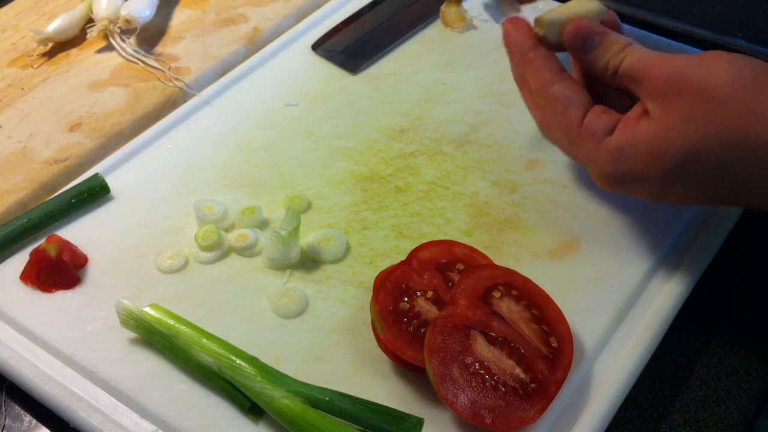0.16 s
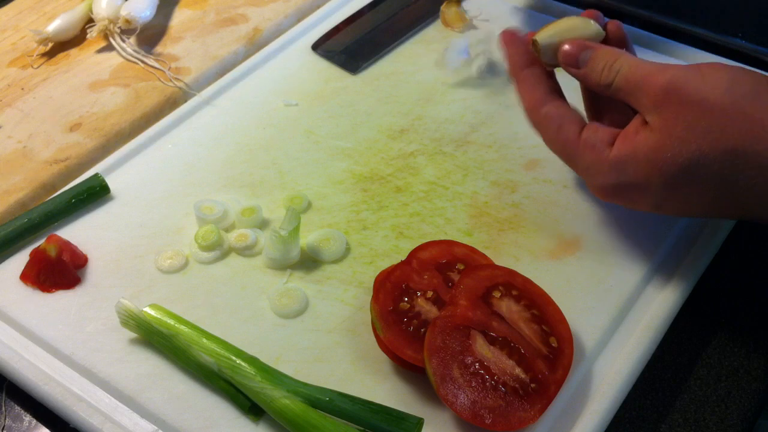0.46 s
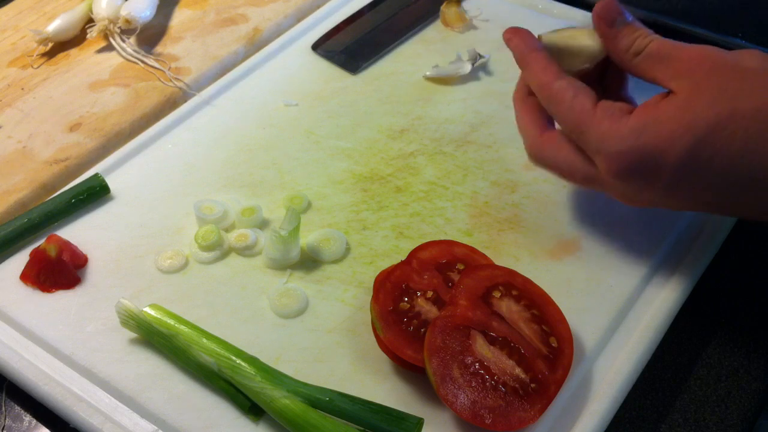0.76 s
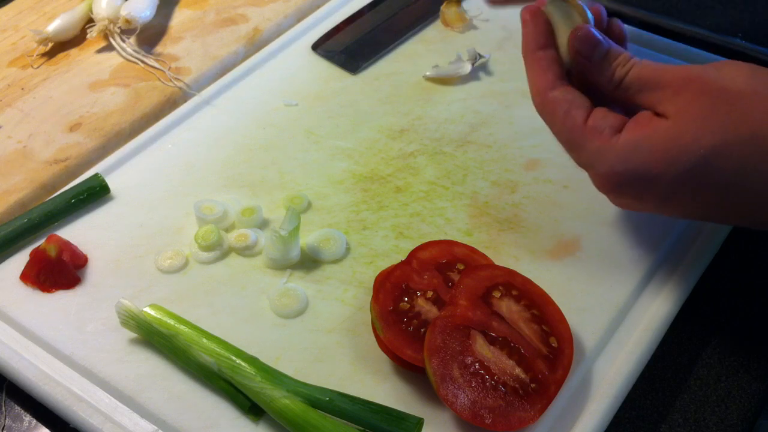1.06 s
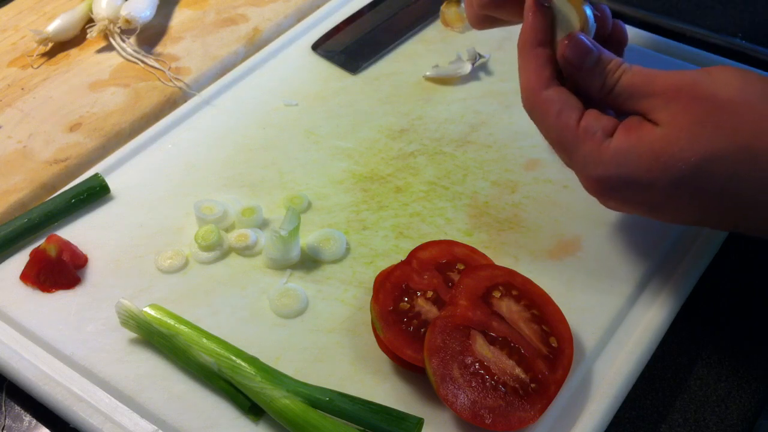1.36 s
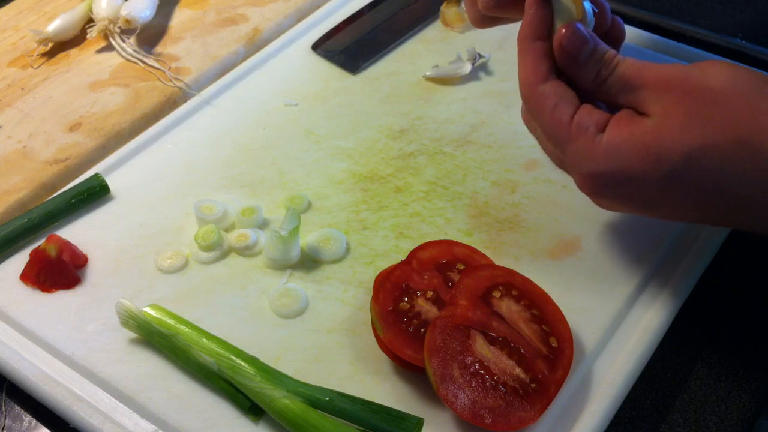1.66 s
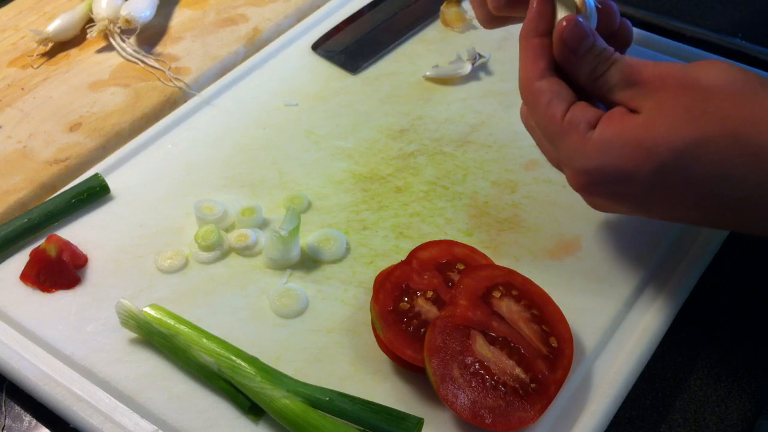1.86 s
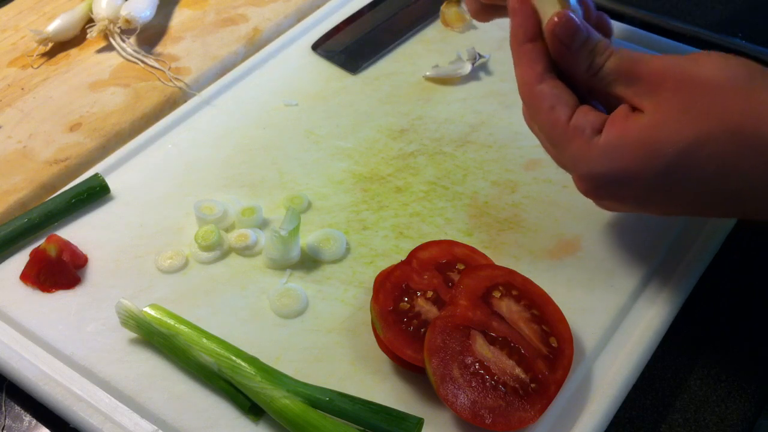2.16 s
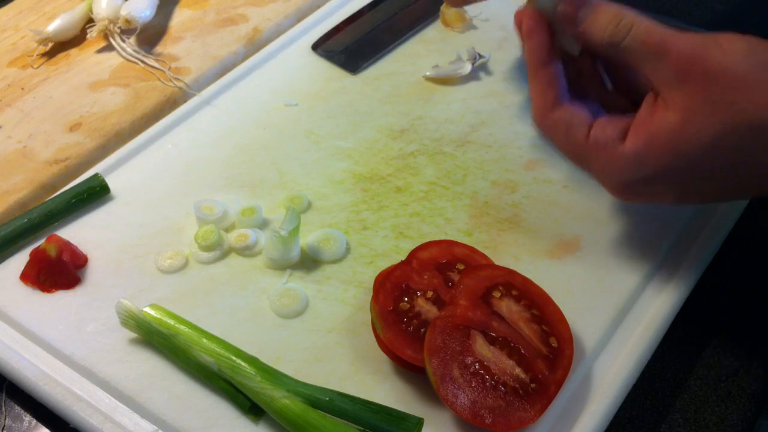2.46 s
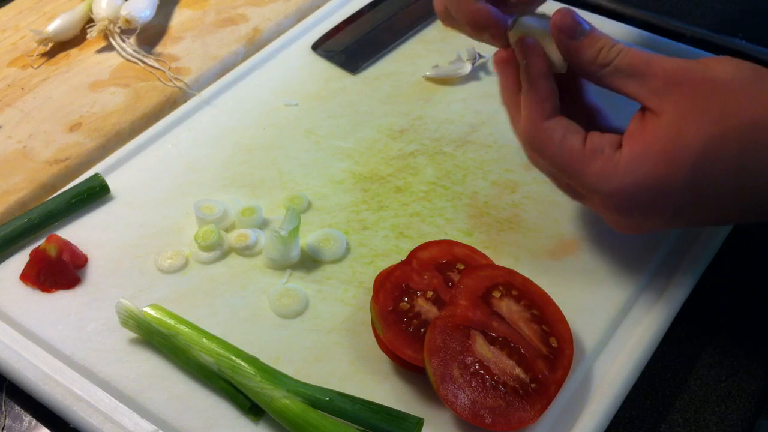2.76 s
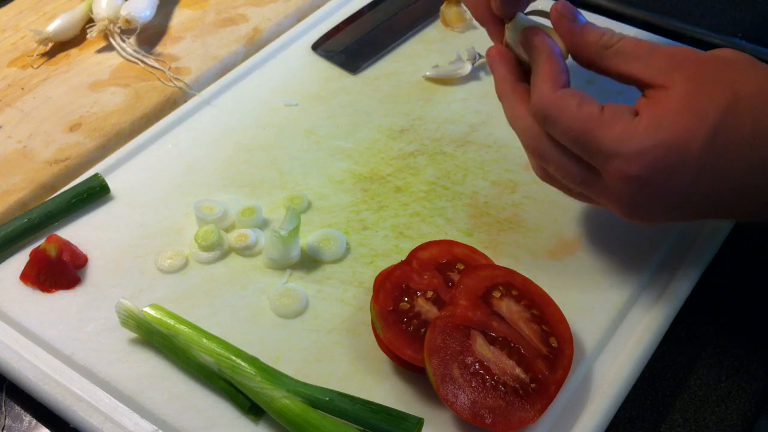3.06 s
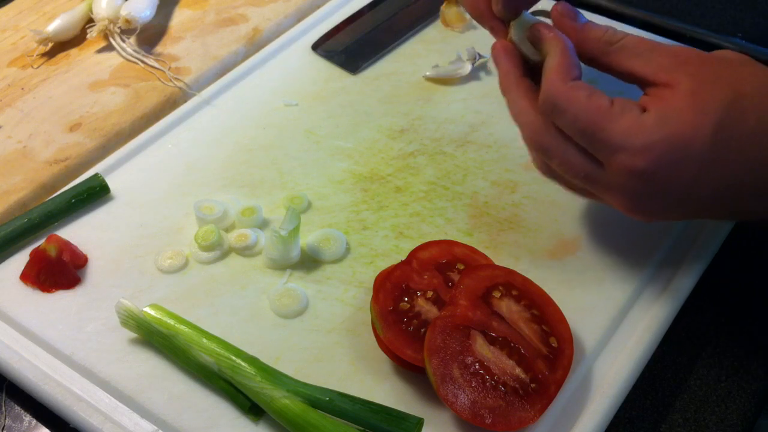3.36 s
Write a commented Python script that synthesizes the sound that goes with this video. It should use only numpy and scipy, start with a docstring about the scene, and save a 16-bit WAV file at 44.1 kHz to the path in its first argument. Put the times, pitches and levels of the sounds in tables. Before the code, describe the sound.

Papery garlic skin being peeled off a clove, with crisp snaps and faint fingernail picks.

```python
"""Papery snaps and crackling tears, loud at first, then small picks of a fingernail:
dry garlic skin is peeled off a clove by hand above a cutting board in a quiet kitchen.
Each crack rings a flake of skin for a few cycles; nail and finger add duller knocks on the clove.
Board and worktop throw each crack back at once; a short room tail, faint hum and hiss lie behind."""
import sys
import numpy as np
from scipy import signal
from scipy.fft import rfft, irfft
from scipy.io import wavfile
from scipy.ndimage import uniform_filter1d

SR = 44100
rng = np.random.default_rng(int(sys.argv[2]) if len(sys.argv) > 2 else 0)


def dump(signal):
    """Clip the signal to [-1, 1] and save it as 16-bit WAV at the path in sys.argv[1]."""
    limited = np.clip(np.atleast_2d(signal).T, -1, 1)
    pcm = np.round(limited * 32767).astype(np.int16)
    wavfile.write(sys.argv[1], SR, pcm)


N = 154350


def skin_snaps():
    """The dry skin breaks in single bright cracks."""
    # Each row: start in seconds, level in dB, flake pitch in Hz, spread in octaves.
    snaps = [(.0405, -16.5, 7800, .8), (.0927, -13, 7800, 0.55), (.1043, -16, 8500, 1.3),
             (.111, -9.5, 12500, 0.65), (.1494, -17, 8600, 0.77), (.1604, -1.5, 9200, 0.41),
             (.1626, -5, 8750, 0.26), (.1965, -9, 8700, 0.7), (.2205, -35, 9000, .7),
             (.4048, -22.5, 11500, 0.35), (.423, -21, 12800, .3), (.5745, -33.5, 8000, 1.6),
             (.59, -32, 12000, .5), (.7405, -26.5, 12900, .3), (.8008, -26, 12000, 0.46),
             (1.337, -33.5, 6160, 0.29), (1.386, -35.5, 9000, 0.78), (1.689, -31.5, 8600, 0.34),
             (1.772, -33, 10500, 0.77), (1.917, -35.5, 11000, 0.59), (2.0138, -24, 10400, 0.6),
             (2.0243, -28, 10000, 0.92), (2.0345, -26, 12000, .7), (2.0385, -27, 11000, 0.64),
             (2.0625, -29, 9500, 0.84), (2.206, -25.5, 13000, 0.54), (2.2373, -22, 11200, .9),
             (3.024, -29.5, 12200, 0.6), (3.104, -44, 12000, .5), (3.376, -38.5, 12000, .4),
             (3.479, -21.5, 12500, 0.54)]
    return place_cracks(snaps)


def skin_tears(cracks_per_s=2000, spread_db=6.5, ease_db=-9.5, size=4096):
    """The skin gives way fibre by fibre: dense cracks of uneven strength, weakening as the pull eases."""
    # Each row: start and length in seconds, level in dB, flake pitch in Hz, spread in octaves.
    tears = [(0, 0.0061, -35.5, 9800, 0.59), (.008, 0.031, -44.5, 9800, .6),
             (0.109, .012, -39.5, 11500, 0.32), (0.136, 0.013, -39, 8800, 0.5),
             (.151, 0.0059, -38, 9000, 0.39), (.179, .017, -44.5, 10100, 0.77),
             (0.192, 0.0063, -33.5, 12960, 0.085), (0.389, 0.028, -54.5, 9050, 0.48),
             (0.422, 0.0082, -48, 12300, 0.32), (0.488, 0.02, -61, 9200, 0.71),
             (1.323, 0.026, -65, 6000, 1.2), (1.393, .025, -70, 6000, 1), (1.791, 0.018, -65.5, 6500, 1.1),
             (2.024, 0.023, -44.5, 11700, 0.84), (2.06, .024, -58.5, 10500, 0.88),
             (2.064, 0.027, -64.5, 5170, 0.11), (3.422, 0.1, -67, 12000, 0.88)]
    out = np.zeros(N)
    t = np.arange(size) / SR
    for start, length, db, hz, octaves in tears:
        uneven_db = spread_db * np.minimum(rng.exponential(1, size), 3)
        strength = amp(uneven_db + ease_db * t / length) * rng.choice([-1, 1], size)
        fibre_breaks = (rng.random(size) < cracks_per_s / SR) & (t < length)
        crackle = signal.fftconvolve(strength * fibre_breaks, signal.fftconvolve(crack(hz, octaves), worktop()))
        add(out, start, amp(db) * np.sqrt(length * SR) * unit(crackle))
    return out


def finger_knocks():
    """Nail and finger bump the clove: the same short pulse, lower and duller."""
    # Each row: start in seconds, level in dB, pitch in Hz, spread in octaves.
    knocks = [(.0935, -30, 2380, 0.65), (.1055, -23, 3200, .5), (.161, -24, 2500, 0.38),
              (.197, -32, 2000, 0.72), (.204, -30.5, 1370, 0.47), (.206, -29.5, 484, 0.34),
              (.494, -38, 2360, .6), (.5895, -32.5, 2700, 0.44), (.591, -39.5, 1110, 0.27),
              (.89, -42, 650, 0.37), (1.265, -38, 3070, 0.57), (2.0245, -30, 2450, 0.12),
              (2.2373, -26, 2700, 0.6), (2.75, -41, 900, 0.5), (3.11, -43, 800, 0.48)]
    return place_cracks(knocks)


def place_cracks(cues):
    """Plays one crack per cue, each with its own echoes off the worktop."""
    out = np.zeros(N)
    for start, db, hz, octaves in cues:
        add(out, start, amp(db) * unit(signal.fftconvolve(crack(hz, octaves), worktop())))
    return out


def crack(hz, octaves, skirt=1.564, dispersion_s=0.000496, size=1024):
    """A flake rings for a few cycles around its pitch; bending waves reach its edge treble first."""
    # The skin's tone colour. Each row: frequency in Hz, gain in dB.
    skin_colour = [(150, 0), (500, -4.5), (1000, -1.5), (2000, 2), (4000, -0.5), (7000, -1.5), (11000, -4),
                   (16000, -0.5)]
    f = abs(np.fft.fftfreq(size, 1 / SR)) + 1
    resonance = (1 + (np.log2(f / hz) / octaves) ** 2) ** (-skirt / 2)
    gain = resonance * amp(read(skin_colour, f))
    # Minimum phase keeps the attack sharp.
    spectrum = np.exp(np.conj(signal.hilbert(np.log(gain))))[:size // 2 + 1]
    delay = dispersion_s * np.linspace(1, 0, len(spectrum))
    dispersion = np.exp(-2j * np.pi * np.cumsum(delay) * SR / size)
    return unit(irfft(spectrum * dispersion)[:size // 2])


def worktop(scatter_db=3, scatter_t60=0.061, rise_s=0.0005, blur_s=0.00019, size=2048):
    """Direct sound, close echoes and scatter from hands and board; new for each position of the clove."""
    # Bounces off board and worktop. Each row: delay in seconds, level in dB.
    echoes = [(.0012, -7.5), (.0023, -2), (.0042, -5.5), (.0063, -8)]
    t = np.arange(size) / SR
    noise = irfft(np.exp(2j * np.pi * rng.random(size // 2 + 1)))
    scatter = noise * (1 - np.exp(-t / rise_s)) * amp(-60 * t / scatter_t60)
    response = amp(scatter_db) * unit(scatter)
    response[0] += 1  # direct sound
    for delay, db in echoes:
        arrival = delay * rng.uniform(.9, 1.1)
        bounce = rng.standard_normal(size) * np.exp(-t / blur_s)
        add(response, arrival, amp(db) * unit(bounce))
    return response


def kitchen_tail(dry, level_db=-7, rise_s=0.0034, tails=4, turn_s=.003):
    """A short diffuse room tail whose treble dies first."""
    # Each row: frequency in Hz, seconds to die away by 60 dB.
    room_t60 = [(300, 0.46), (2000, 0.28), (7000, 0.29), (15000, 0.21)]
    out = np.zeros(N)
    # Four noise tails alternate every 3 ms so the room sounds smooth, without ringing.
    active_tail = (np.arange(N) / SR // turn_s) % tails
    for k in range(tails):
        hz, t, noise = signal.stft(rng.standard_normal(SR // 2), SR, nperseg=256)
        decay = amp(-60 * t / read(room_t60, hz)[:, None])
        tail = signal.istft(noise * decay, SR, nperseg=256)[1]
        rise = 1 - np.exp(-(np.arange(len(tail)) / SR / rise_s) ** 2)
        crossfade = np.sin(np.pi / 2 * uniform_filter1d(1. * (active_tail == k), size=64))
        out += signal.fftconvolve(dry * crossfade, unit(tail * rise))[:N]
    return amp(level_db) * out


def room_tone(level_db=-65):
    """A steady bed of soft hiss, fullest in the low mids."""
    # Each row: frequency in Hz, relative noise density in dB.
    hiss_colour = [(10, -11), (45, -16.5), (78, -15), (115, -6.5), (150, -2), (210, 2), (290, -1),
                   (420, -1.5), (650, -4.5), (1200, -7.5), (4000, -10), (10000, -12), (15800, -13)]
    gain = amp(read(hiss_colour, np.fft.rfftfreq(N, 1 / SR)))
    hiss = irfft(rfft(rng.standard_normal(N)) * gain, N)
    return amp(level_db) * np.sqrt(N) * unit(hiss)


def appliance_hum(wander_hz=1.32):
    """An appliance hums in faint low tones, each wavering in pitch."""
    # Each row: frequency in Hz, RMS level in dB.
    tones = [(97, -85.5), (196, -92.5), (247.6, -85), (344.5, -82)]
    out = np.zeros(N)
    for hz, db in tones:
        wander = np.sqrt(N) * unit(uniform_filter1d(rng.standard_normal(N), size=4000))
        phase = 2 * np.pi * np.cumsum(hz + wander_hz * wander) / SR
        out += amp(db) * np.sqrt(2) * np.sin(phase)
    return out


def amp(db):
    """Decibels to gain."""
    return 10 ** (np.asarray(db) / 20)


def unit(x):
    """Scales to energy 1."""
    return x / np.sqrt(np.sum(x ** 2) + 1e-20)


def read(points, hz):
    """Reads a curve on a log-frequency axis."""
    f, value = np.transpose(points)
    return np.interp(np.log(hz + 1), np.log(f + 1), value)


def add(mix, start_s, sound):
    """Drops a sound into the mix."""
    part = mix[max(round(start_s * SR), 0):][:len(sound)]
    part += sound[:len(part)]


def scene():
    """Close peeling over the quiet kitchen, in mono."""
    peel = skin_snaps() + finger_knocks() + skin_tears()
    return (peel + kitchen_tail(peel) + room_tone() + appliance_hum())[None]


def record(dry, cutoff_hz=15950):
    """A steep low-pass trims the very top."""
    lowpass = signal.firwin(511, cutoff_hz, window=("kaiser", 8), fs=SR)
    return signal.oaconvolve(dry, lowpass[None], "same")


dry = scene()
out = record(dry)
dump(out)
```